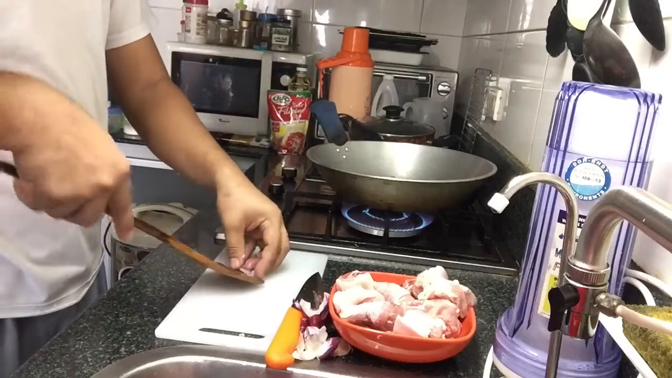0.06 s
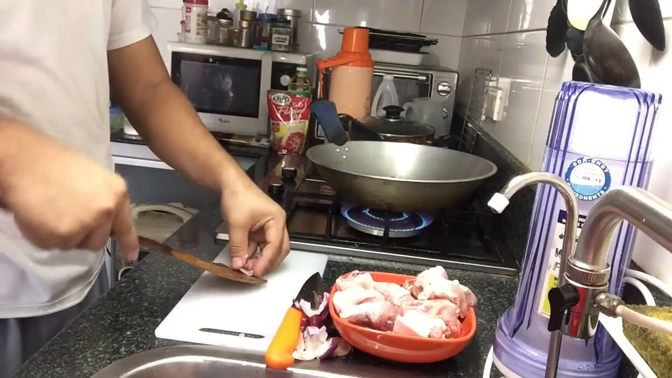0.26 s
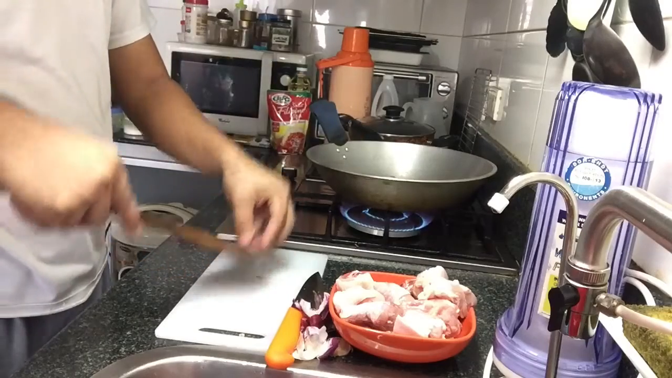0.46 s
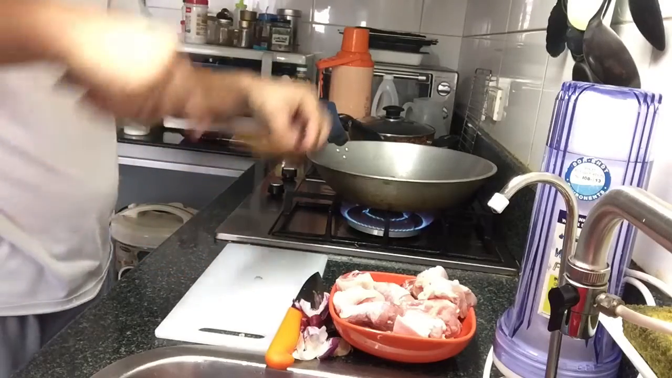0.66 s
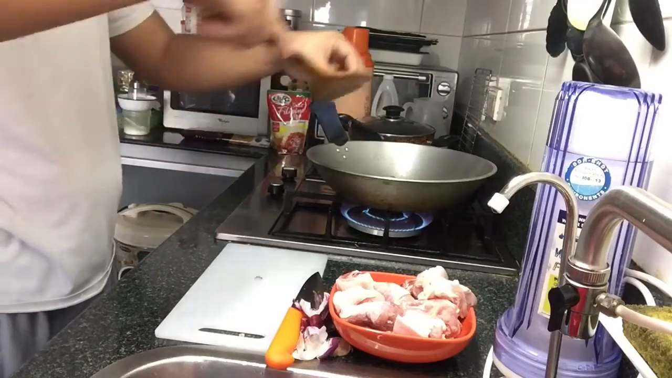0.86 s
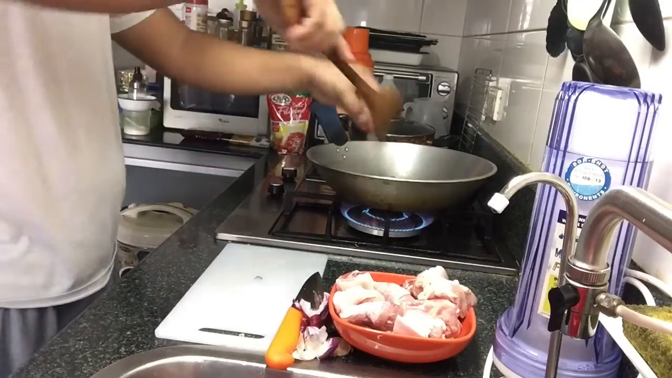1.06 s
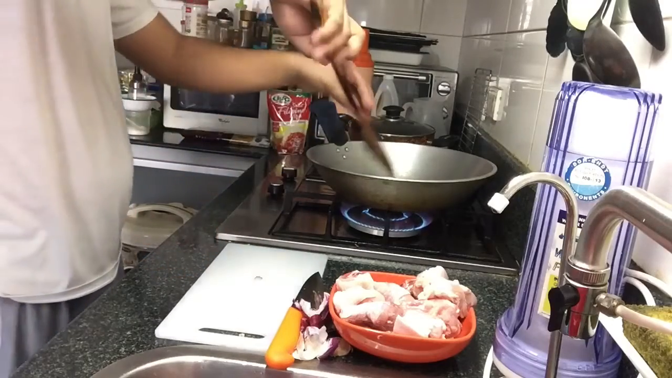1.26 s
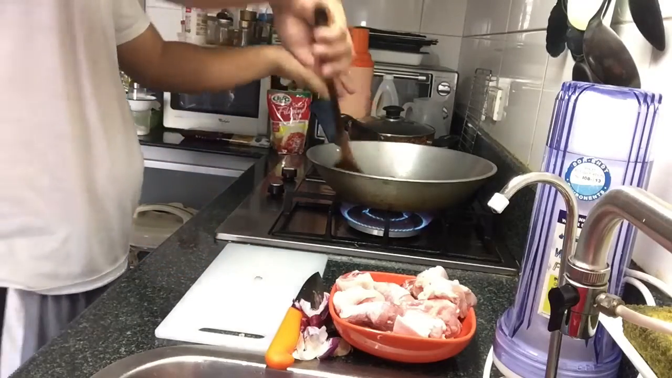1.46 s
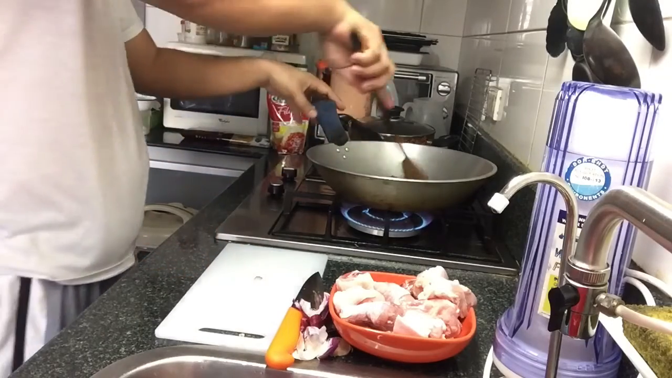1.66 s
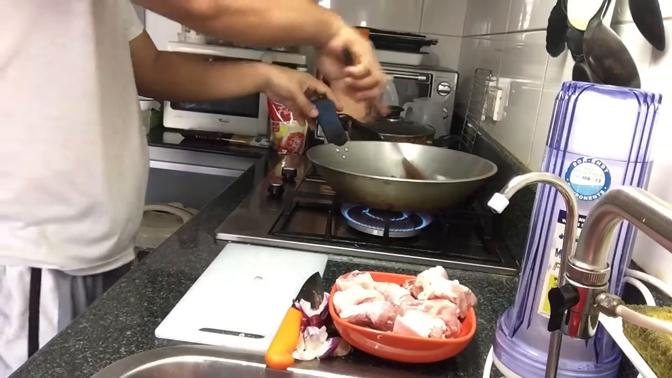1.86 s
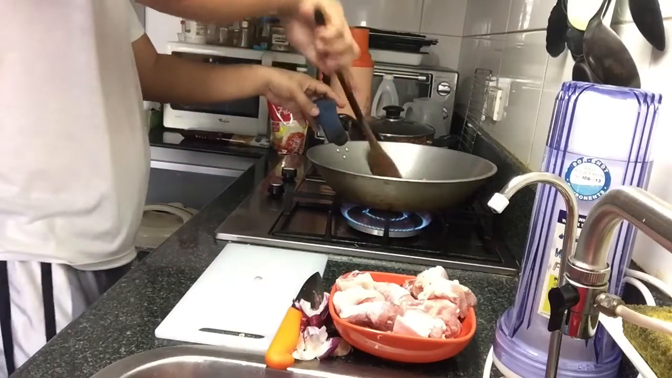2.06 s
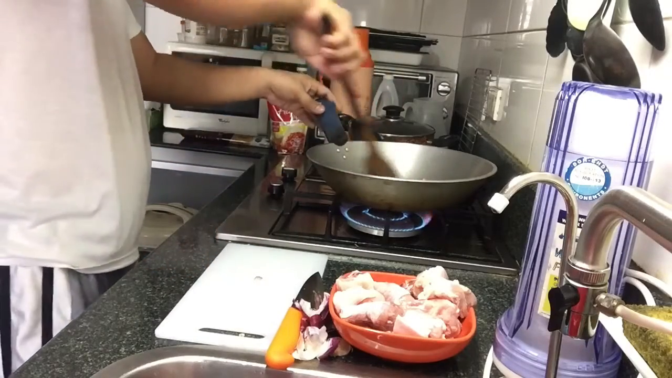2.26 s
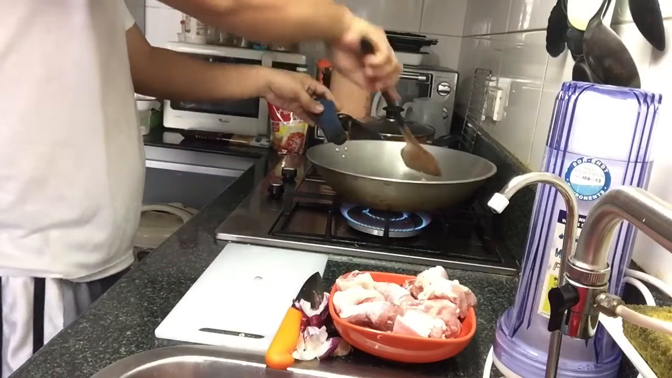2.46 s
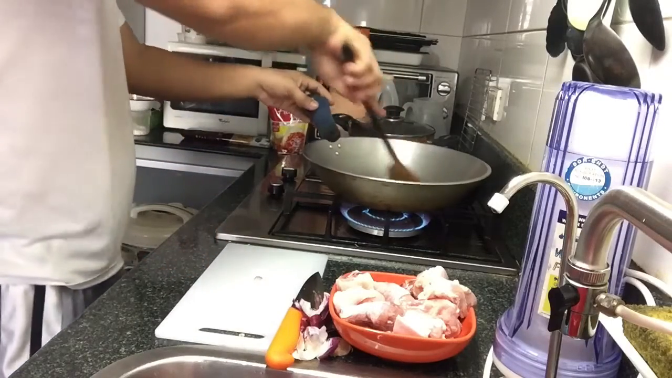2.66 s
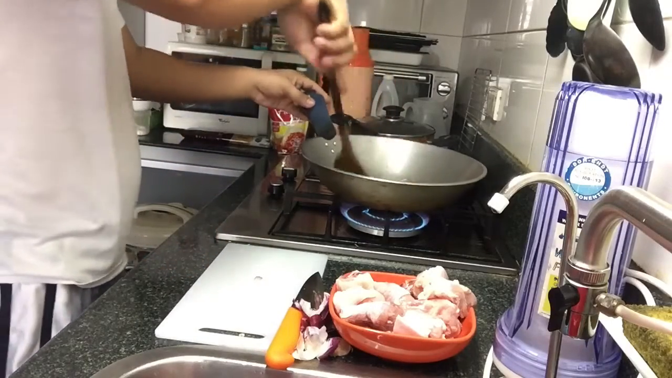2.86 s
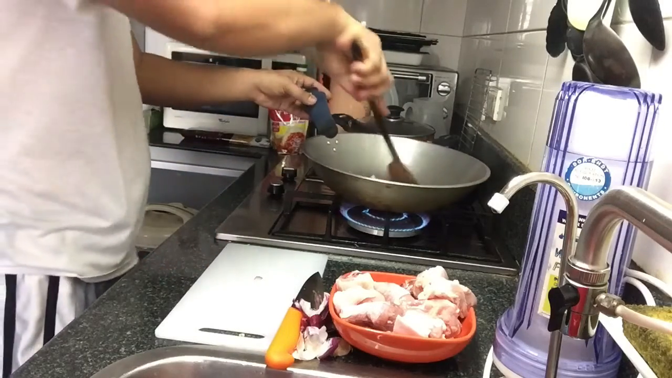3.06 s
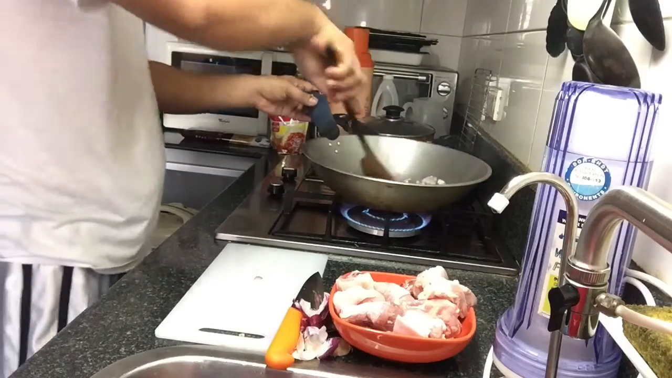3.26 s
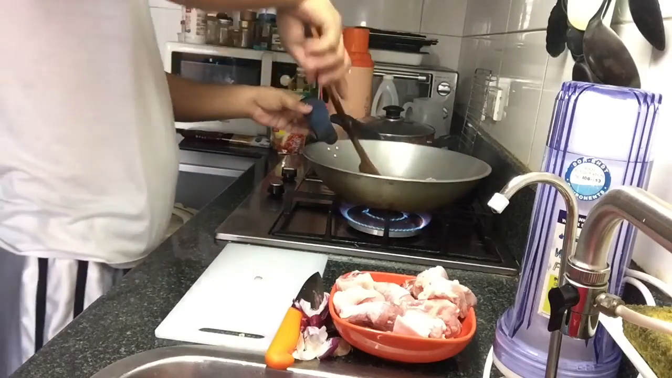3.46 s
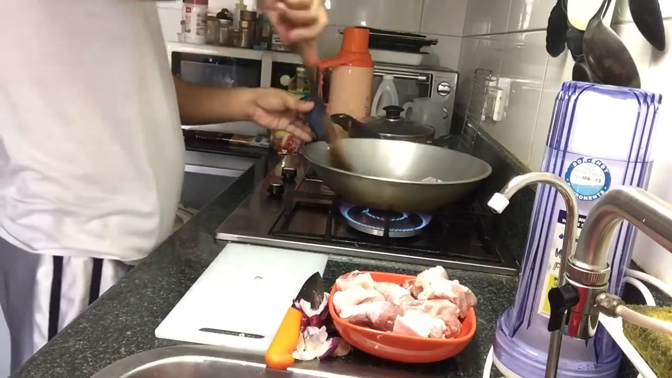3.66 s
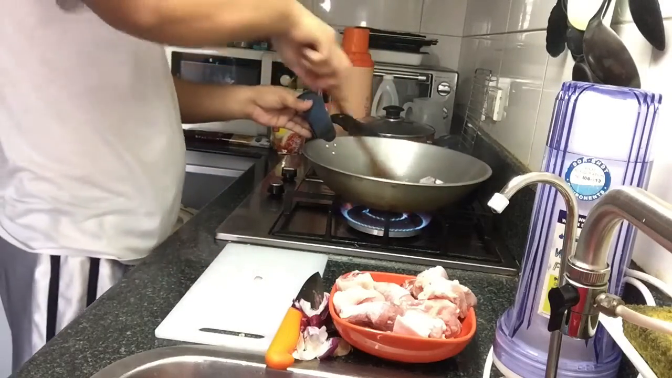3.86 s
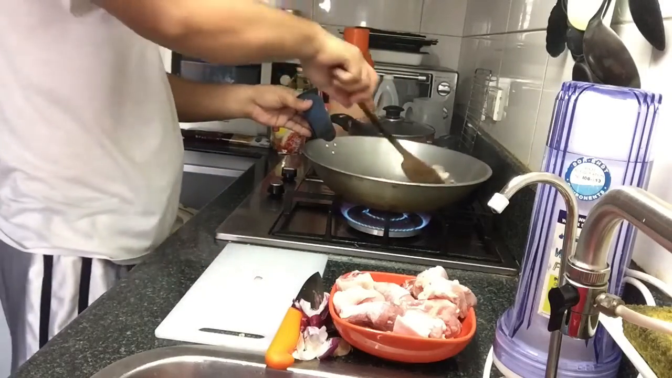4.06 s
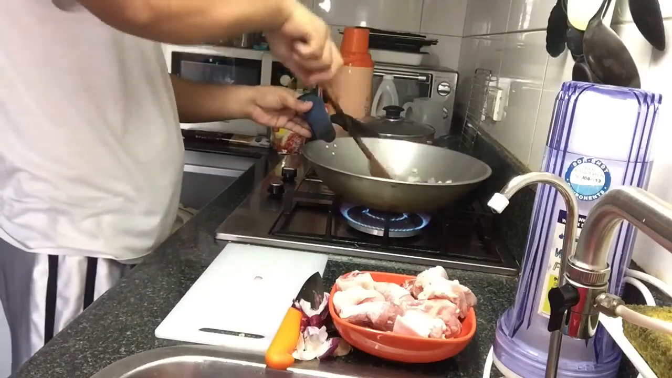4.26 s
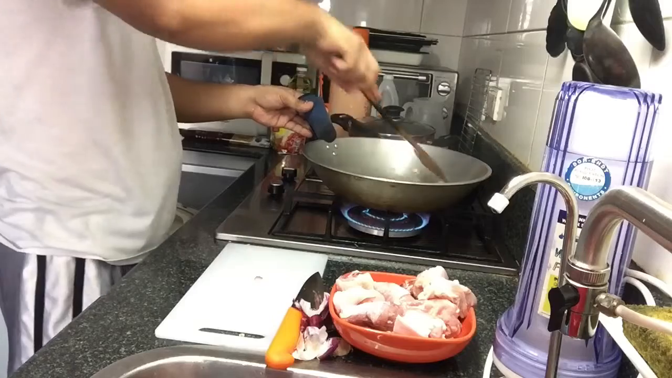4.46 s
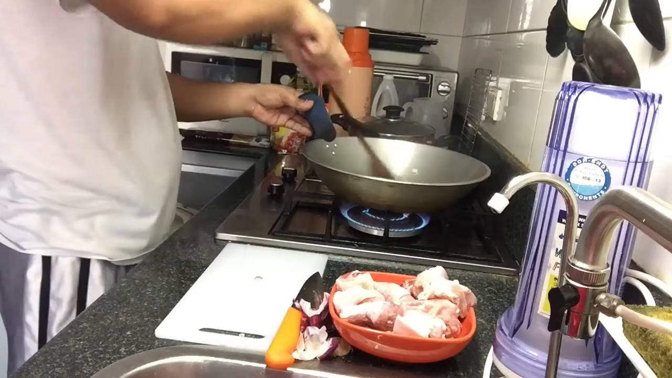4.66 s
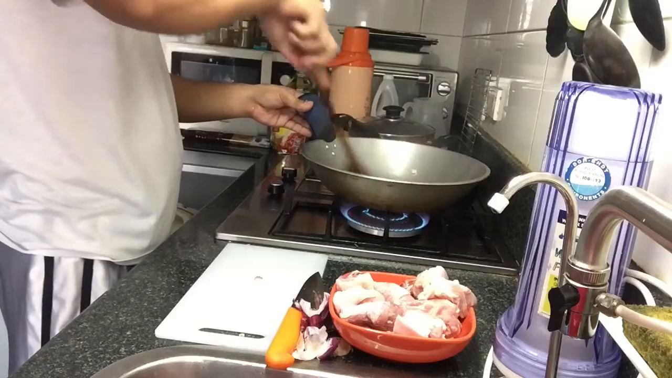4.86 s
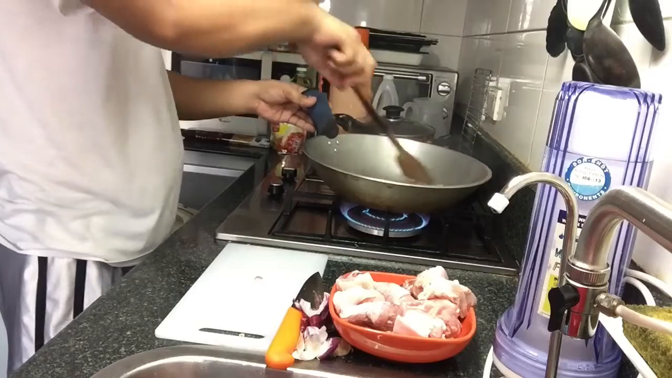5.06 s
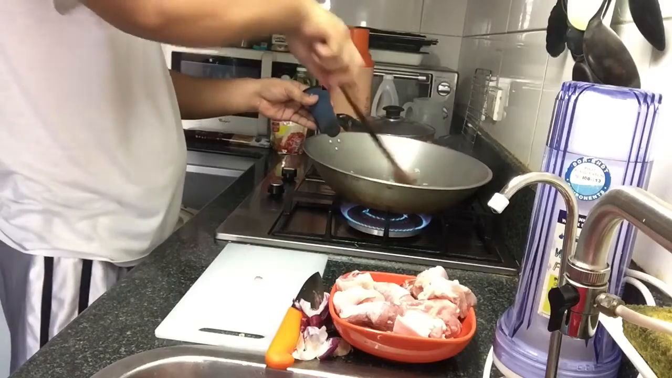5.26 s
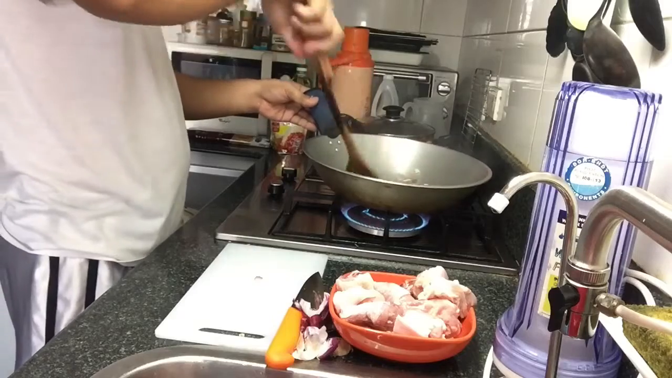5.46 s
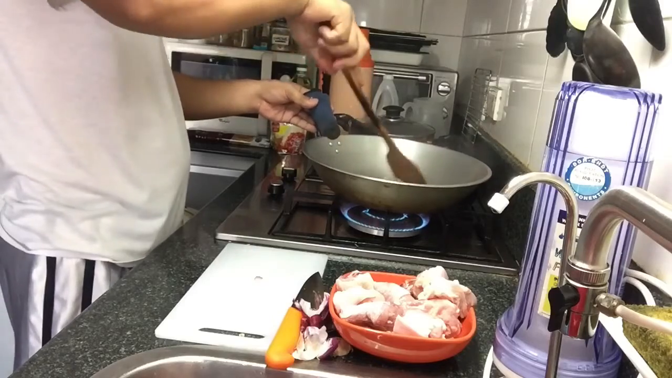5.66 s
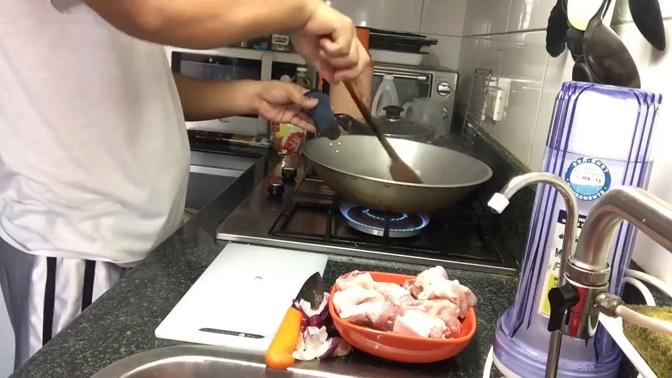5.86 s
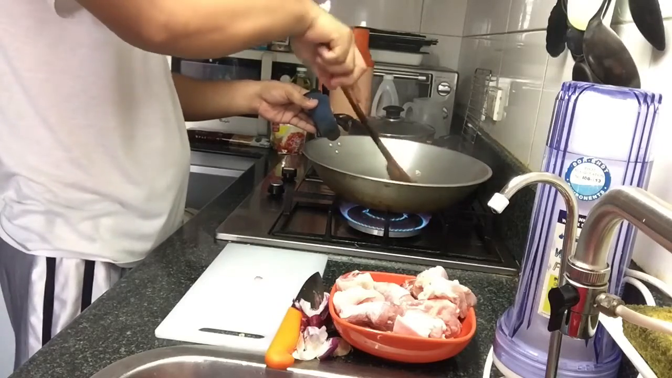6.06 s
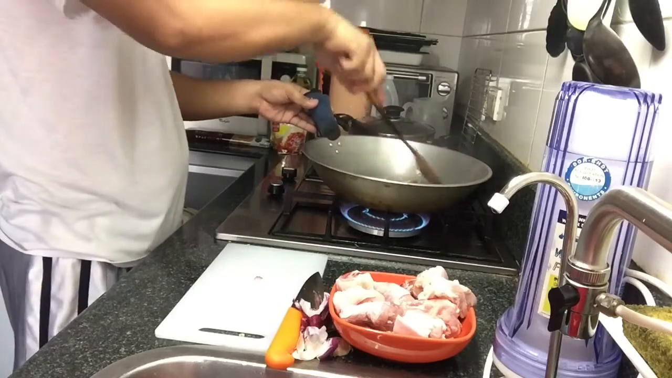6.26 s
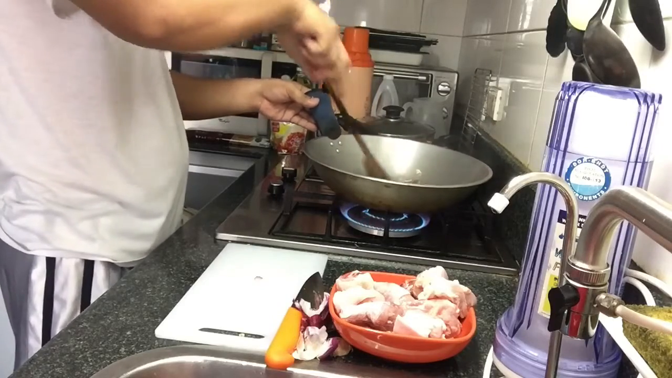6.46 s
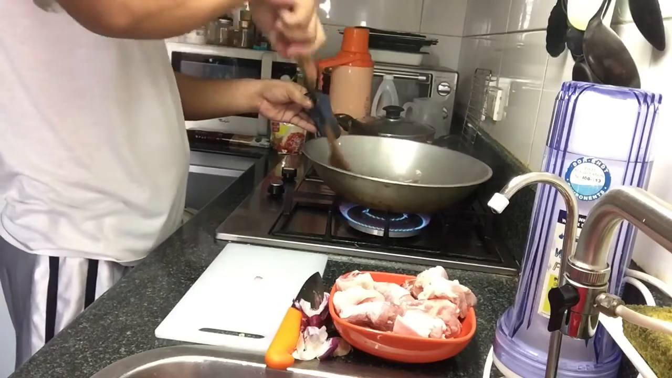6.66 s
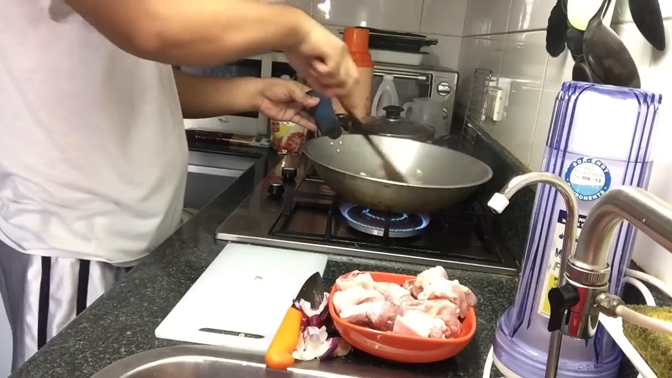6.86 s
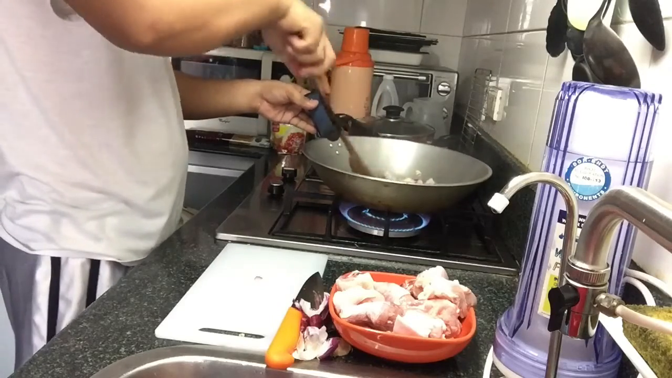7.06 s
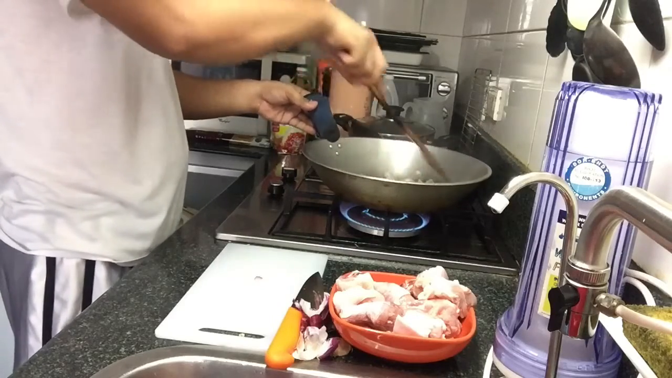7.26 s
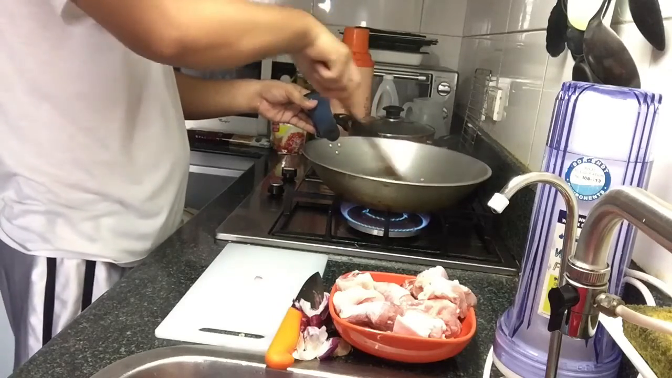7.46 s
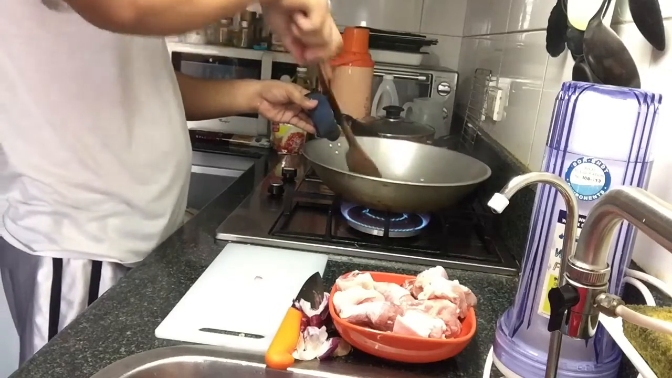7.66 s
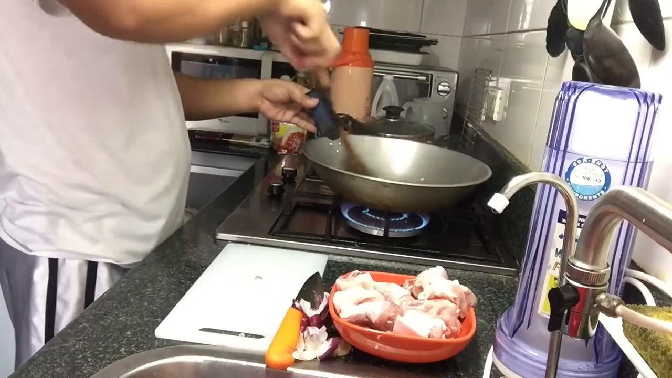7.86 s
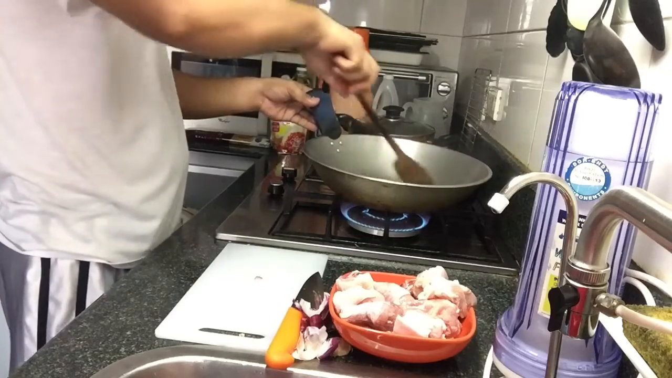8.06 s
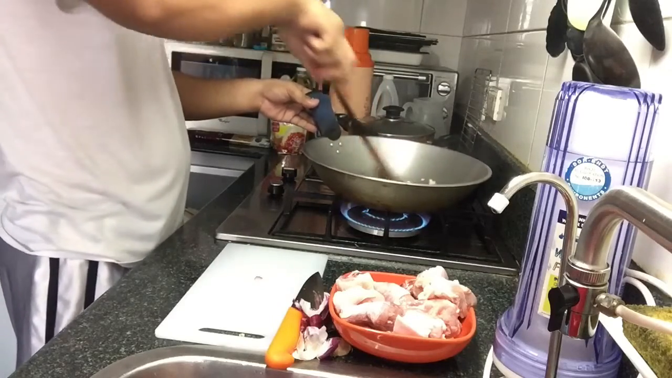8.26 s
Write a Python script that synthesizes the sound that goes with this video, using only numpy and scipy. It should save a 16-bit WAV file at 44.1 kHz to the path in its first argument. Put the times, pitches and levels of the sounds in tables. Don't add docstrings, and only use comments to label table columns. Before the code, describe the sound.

A continuous bright sizzle of garlic and onion in hot oil, fine and hissy, with tiny crackles and sharp spits, over low burner roar, compressor hum and a thin mid-pitched whine that enters around 0.7 s. From 0 to 1.5 s the frying is moderate, with only soft taps and bumps. At 1.5-2.1 s the wooden spatula starts knocking the steel wok and the fizz swells clearly. Scraping continues; a hard clank lands at 3.1 s, then a quick cluster at 3.5-3.9 s with dull short rings and grate thuds. A strong spit snaps at 4.0 s; softer bumps and scraping follow until 5. Knocks return at 5.3 and 5.6 s, the loudest clank at 6.4 s, another at 6.8 s, and a stronger scrape at 7.1 s. Light bumps at 7.5-8 s; sizzling continues to the end at 8.3 s. Close, dry, small tiled room, essentially mono.

```python
import sys
import numpy as np
from scipy import signal
from scipy.fft import rfft, irfft
from scipy.io import wavfile
from scipy.ndimage import uniform_filter1d

SR = 44100
rng = np.random.default_rng(int(sys.argv[2]) if len(sys.argv) > 2 else 0)


def ratio(d):
    e = np.asarray(d, float) / 20
    return 10 ** e


def bounce(signal):
    frames = np.transpose(np.atleast_2d(signal))
    limited = np.clip(frames, -1, 1)
    pcm = np.round(limited * 32767).astype(np.int16)
    wavfile.write(sys.argv[1], SR, pcm)


N = 367353

# frequency in Hz, density in dB per Hz.
AIR_SPECTRUM = [(12, -57), (25, -26), (55, -10), (85, -9), (118, 0), (230, -3), (330, -18.5), (450, -51),
                (640, -10), (810, -32), (1050, -14.5), (2500, -32), (5500, -90)]
# frequency in Hz, level in dB.
HUM = [(119.4, -51.5), (527.6, -72.5), (882.9, -68), (1238, -64.5), (1297, -81), (1653, -65)]
# time in seconds, level in dB.
WHINE = [
    (.66, -68),
    (.71, -55),
    (1.5, -57),
    (2.1, -54),
    (2.7, -60),
    (4.0, -57),
    (7.0, -56),
    (7.15, -53),
    (8.33, -55),
]
# frequency in Hz, level in dB, decay time t60 in seconds.
PAN_MODES = [(46.3, -22, 1), (66, 0, 0.096), (82.3, -33, 1), (110.9, 0, 0.59), (120.95, -2.5, 0.85),
             (160.5, 1, 0.9), (192.3, -2, 0.59), (214.5, -6, 0.62), (257.4, -6.5, 0.4), (385, 2.5, 0.33),
             (475.5, 6, 0.064), (595, 4.5, 0.18), (662, 4.5, 0.46), (735, -14, 0.17), (915, -16, 0.14),
             (1090, -6, 0.059), (1170, -4, 0.63), (1430, -11, 0.51), (1467, 4, 0.29), (1577, -1.5, 0.51),
             (1890, 1.5, 0.05), (1984, 2.5, 0.26), (1990, -26.5, 0.41), (2185, -17, 0.23), (2296, 0, 0.15),
             (2740, -2.5, 0.045), (2920, -11, 0.055), (3160, -1, 0.047), (3262, 3, 0.18), (3730, -11, 0.16)]
PART_EDGES_HZ = [300, 800, 1700]
# time in seconds, level in dB.
PRESSURE = [(0, -58), (1.55, -61), (1.72, -51.5), (2.74, -48), (4.08, -51), (4.34, -53), (4.9, -51),
            (5.24, -48.5), (5.4, -52), (5.7, -55), (5.98, -50.5), (6.38, -58), (6.77, -49), (7.07, -42),
            (7.28, -54), (7.66, -49), (7.79, -52.5), (8.33, -56)]
# start in seconds, blow in dB, grate thud in dB, favoured pitch in Hz.
BLOWS = [(0.054, -46.5, -65, 3370), (1.548, -44.5, -43, 2000), (1.709, -39.5, -61, 1530),
         (2.028, -36.5, -38, 3080), (2.791, -41.5, -38.5, 1800), (3.059, -30, -35, 3200),
         (3.53, -35.5, -29.5, 1480), (3.561, -31.5, -29, 2920), (3.63, -39, -39, 2920),
         (3.845, -34.5, -31, 2750), (5.33, -32.5, -39.5, 1350), (5.627, -32.5, -37, 3730),
         (6.149, -50, -45, 1130), (6.442, -27.5, -34.5, 1320), (6.84, -31, -38.5, 1920),
         (7.039, -49, -42, 2790), (7.19, -46, -46, 1500), (7.551, -44, -36, 2830)]
# start in seconds, belly level in dB, grate thud in dB.
BUMPS = [(0.387, -46, -45.5), (0.684, -46.5, -48), (1.177, -47, -56), (1.587, -42, -37.5),
         (2.574, -49, -39.5), (2.642, -48, -46), (2.716, -37, -38.5), (3.19, -44, -42), (3.251, -41, -41.5),
         (4.337, -48, -47.5), (4.698, -40.5, -38.5), (4.972, -41, -34), (5.937, -51, -36.5),
         (6.024, -50, -51), (6.341, -46, -51), (7.509, -38, -47), (7.596, -36.5, -44), (7.924, -45, -49),
         (7.966, -47, -47)]
# start in seconds, three pitches in Hz, level in dB.
RINGS = [(3.059, 1614, 1910, 3224, -37), (3.529, 1442, 2020, 4150, -34), (3.562, 2300, 2257, 2920, -30.5),
         (3.63, 2185, 2300, 2850, -41.5), (3.845, 1168, 1430, 2770, -36.5), (5.328, 662, 1098, 1395, -36),
         (5.622, 1200, 3190, 3730, -40), (6.442, 915, 1094, 1410, -31), (6.695, 2860, 3300, 3620, -42),
         (6.840, 1520, 1870, 2040, -35), (6.846, 2180, 3260, 3330, -42.5), (6.443, 481, 662, 800, -34),
         (3.846, 1980, 2330, 2900, -41), (5.640, 1206, 3300, 1590, -39)]
# time in seconds, fizz in dB, bubble fineness in dB.
FRYING = [(0.0, -34.5, 1), (0.16, -35, 1.5), (0.21, -37, -0.2), (0.56, -37, 1.5), (0.6, -38.5, 0.9),
          (1.55, -38, 0.3), (2.06, -29.5, 0.1), (3.5, -33, 0.1), (3.55, -31, -2.5), (3.69, -34, -0.8),
          (4.13, -29, 0.3), (4.22, -32.5, -0.8), (4.38, -30, 1), (5.26, -32.5, 0.7), (5.36, -31.5, 0.4),
          (6.89, -34, -1), (7.01, -34, 0.6), (8.33, -34, 1.3)]
# peak time in seconds, flare in dB, added fineness in dB.
FLARES = [(1.72, 2, -1), (2.55, 1.8, 0.5), (3.14, 1.5, -1.3), (4.44, 1.5, -.6), (1.87, 0.5, -1),
          (4.25, 0.3, 1.2), (3.74, .6, 1), (4.8, 1, 0), (5.0, 0.3, -0.7), (5.5, 2.9, 1.3),
          (5.69, 1.5, -1.2), (6.7, 0.1, 1.5), (7.06, 2.9, -0.5), (7.27, 2.5, -0.3), (7.68, 2.5, -2),
          (8.01, 1.8, -2.3)]
# start in seconds, peak in dB, centre in Hz.
SPITS = [(0.0542, -13, 3200), (0.1446, -18, 5470), (0.3696, -17, 8050), (0.5136, -16, 7900),
         (0.5414, -19, 7170), (0.9133, -26, 8120), (1.026, -14, 10500), (1.1793, -22, 3600),
         (1.269, -18, 6910), (1.483, -20, 3170), (1.699, -21, 7020), (1.9046, -16, 6770),
         (2.0767, -10.5, 7200), (2.2193, -16, 5270), (2.5546, -13.5, 5670), (2.74, -13, 8470),
         (3.058, -18, 3230), (3.5262, -13, 4160), (3.6611, -23, 6760), (3.8743, -17, 4580),
         (4.0073, -9, 11600), (4.122, -21, 5600), (4.79, -14, 4800), (5.8436, -26, 6220),
         (6.0702, -14.5, 7190), (6.7, -20, 3400), (7.2754, -16, 12400), (7.67, -18, 4200),
         (7.9079, -24, 11400), (7.9788, -12.5, 5700)]
# time in seconds, low edge in Hz.
SIDE_BANDS = [(1.514, 7570), (1.514, 12400), (1.514, 4230), (1.888, 5680), (1.888, 13780), (2.214, 8180),
              (2.816, 4230), (2.816, 8180), (2.935, 9640), (4.21, 8260), (4.21, 6280), (4.21, 14460),
              (5.188, 5140), (5.278, 12400), (5.418, 4650), (5.436, 6240), (5.436, 7600), (5.436, 9000),
              (5.436, 10400), (5.882, 6240), (6.092, 14460), (6.092, 5680), (6.092, 8260), (7.067, 6280),
              (8.181, 7570), (8.248, 10330), (8.318, 13900), (8.32, 6880)]
# frequency in Hz, density in dB per Hz.
FIZZ_SPECTRUM = [(300, -45), (800, -15), (1050, -9), (1700, -8.5), (2600, -4.5), (4200, 0), (6700, 2.5),
                 (8000, 0.5), (11500, 0), (15700, -1.5)]
# frequency in Hz, width in Hz, depth in dB.
BOWL_DIPS = [(4927, 98, -12), (7670, 450, -1.5), (10450, 440, -4.5)]


def evened(x):
    return x / np.sqrt(np.mean(x ** 2) + 1e-20)


def read(points, hz):
    f, value = np.transpose(points)
    return np.interp(np.log(hz + 1), np.log(f + 1), value)


def follow(rows, t):
    s, *columns = np.transpose(rows)
    return [np.interp(t, s, c) for c in columns]


def add(mix, s, sound):
    part = mix[max(round(s * SR), 0):][:len(sound)]
    part += sound[:len(part)]


def resonate(x, hz, width_hz):
    r = np.exp(-np.pi * width_hz / SR)
    poles = [2, -4 * r * np.cos(2 * np.pi * hz / SR), 2 * r * r]
    return signal.lfilter([1 - r * r, 0, r * r - 1], poles, x)


def drift(shape, frames, bins):
    field = uniform_filter1d(rng.standard_normal(shape), max(round(frames), 1), 0)
    return evened(uniform_filter1d(field, max(round(bins), 1), 1))


def clicks(per_s, spread_db):
    chance, sign, size = rng.random(N), rng.choice([-1., 1.], N), rng.exponential(1, N)
    return evened(sign * ratio(spread_db * np.minimum(size, 5)) * (chance < per_s / SR))


def kitchen(x, t60, wet_db):
    t = np.arange(SR // 2) / SR
    tail = rng.standard_normal(len(t)) * ratio(-60 * t / t60) * (t > .003)
    return x + ratio(wet_db) * signal.oaconvolve(x, tail / np.linalg.norm(tail))[:N]


def air():
    level_db = -50.5 - 2.5
    z = rfft(rng.standard_normal(N))
    return ratio(level_db) * evened(irfft(z * ratio(read(AIR_SPECTRUM, np.fft.rfftfreq(N, 1 / SR))), N))


def compressor():
    t = np.arange(N) / SR
    wobble = np.interp(t, np.linspace(0, t[-1], 110), rng.standard_normal(110))
    waver_s, unsteady_db, whine_hz = .0008, 1.1, 1118
    hum = 0
    for k, (hz, db) in enumerate(HUM + [(whine_hz, follow(WHINE, t)[0])]):
        level = np.sqrt(2) * ratio(db + unsteady_db * np.roll(wobble, 9000 * k))
        hum = hum + level * np.sin(2 * np.pi * hz * t + waver_s * hz * wobble + k)
    return hum


def contacts():
    rows = []
    for s, db, thud_db, hz in BLOWS:
        height = np.log2(hz / 2000)
        rows.append((s, db - height, db, db + 8.5 * height, thud_db, hz))
    for s, db, thud_db in BUMPS:
        rows.append((s, db, db - 12, db - 1, thud_db, 3130))
    return rows


def rocking(t):
    idle_db, rock_db, rock_s = -49.5, -3.5, 0.067
    power = ratio(idle_db) ** 2
    for s, _, _, _, thud_db, _ in contacts():
        since = np.maximum(t - s, 0) / rock_s
        power = power + (ratio(thud_db + rock_db) * since * np.exp(1 - since)) ** 2
    return np.sqrt(power)


def stirring():
    t, coarse_t = np.arange(N) / SR, np.arange(0, N + 200, 100) / SR
    scrape_db = follow(PRESSURE, t)[0]
    sway = np.interp(t, coarse_t, rocking(coarse_t))
    slips, bumps = clicks(per_s=1900, spread_db=2.5), clicks(per_s=2100, spread_db=6.0)
    scrape = ratio(14.5) * resonate(slips, 643, 26)
    rock = np.zeros(N)
    for hz, db, t60 in PAN_MODES:
        if hz > PART_EDGES_HZ[0]:
            scrape += ratio(db - 1.5 * abs(np.log2(hz / 660))) * resonate(slips, hz, 7 / t60)
        if hz < PART_EDGES_HZ[0]:
            rock += ratio(db) * resonate(resonate(bumps, hz, 8 / t60), hz, 57)
    return ratio(scrape_db - 5.5) * evened(scrape) + ratio(-3.5) * sway * evened(rock)


def rings():
    out, t = np.zeros(N), np.arange(int(.3 * SR)) / SR
    t60 = 0.18
    for s, *hz, db in RINGS:
        bounce_hz, turn = rng.uniform(25, 61, (3, 1)), rng.random((3, 1))
        throb = 1 + .6 * np.cos(2 * np.pi * (bounce_hz * t - .2))
        tones = (throb * np.sin(2 * np.pi * (np.outer(hz, t) + turn))).sum(0)
        decay = ratio(db + 1.0 - 60 * np.maximum(t - .008, 0) / t60)
        add(out, s, decay * np.minimum(t / 0.002, 1) * tones)
    return out


def wood_crack(t, belly_db, wall_db, rim_db):
    after = np.maximum(t - .014, 0)
    chatter = (ratio(-60 * after / .11) + .2 * ratio(-60 * after / .35)) * np.minimum(t / .0015, 1)
    crack = np.zeros(len(t))
    for db, hz, width_hz in [(wall_db + 9, 1120, 970), (belly_db + 8.5, 410, 590), (rim_db + 1.5, 2800, 1800)]:
        wood = rng.standard_normal(len(t)) * chatter
        crack += ratio(db) * resonate(resonate(wood, hz, width_hz), hz, width_hz)
    return crack


def knocks():
    out, t = np.zeros(N), np.arange(int(.4 * SR)) / SR
    hz, db, t60 = np.array(PAN_MODES).T[:, :, None]
    part = np.searchsorted(PART_EDGES_HZ, hz[:, 0])
    rise = 1 - np.exp(-t * hz / 0.7)
    after = np.maximum(t - .014, 0)
    choke = ratio(-60 * after / (0.8 * t60)) + 0.18 * ratio(-60 * after / (1.05 * t60))
    for s, belly_db, wall_db, rim_db, thud_db, favoured_hz in contacts():
        place_db, detune, turn, split = rng.standard_normal((4, len(PAN_MODES), 1))
        part_db = np.array([thud_db - 5.5, belly_db - 17.5, wall_db - 13, rim_db - 19.0])
        blow_db = part_db[part][:, None]
        octaves = abs(np.log2(hz / favoured_hz))
        favour_db = 5 * np.exp(-(octaves / 0.052) ** 2) - 6 * octaves * (hz > PART_EDGES_HZ[2])
        beat_hz = (14 + 4 * split) * (hz / 660) ** 0.52
        beat = 1 + 0.17 * np.cos(2 * np.pi * (beat_hz * t - .15))
        tone = np.sin(2 * np.pi * (hz * (1 + 0.0078 * detune) * t + turn))
        level = ratio(blow_db + db + favour_db + 1.9 * place_db)
        sound = (level * tone * beat * rise * choke).sum(0) + wood_crack(t, belly_db, wall_db, rim_db)
        add(out, s - .001, sound * np.minimum((t[-1] - t) / 0.044, 1))
    return out


def crackle():
    fizz_db = follow(FRYING, np.arange(N) / SR)[0]
    t = np.arange(SR // 100) / SR
    snaps = signal.oaconvolve(abs(clicks(per_s=90, spread_db=3.5)), ratio(-60 * t / .004))[:N]
    return ratio(fizz_db - 13) * evened(resonate(snaps * rng.standard_normal(N), 9000, 9000))


def spits():
    out, t = np.zeros(N), np.arange(SR // 8) / SR
    pop = 2.2 * ratio(-60 * t / 0.003) + .7 * ratio(-60 * t / 0.016)
    echo = 0.29 * np.roll(pop, round(0.014 * SR))
    steam = ratio(-6 - 60 * t / 0.11) * np.minimum(t / 0.0029, 1)
    shape = (pop + echo + steam) * np.minimum(t / .0004, 1)
    for s, db, hz in SPITS:
        noise = rng.standard_normal(len(t))
        hiss = 0.23 * hz / 7000 * np.diff(noise, prepend=0)
        puff = evened(resonate(noise, hz, 0.19 * hz + hz * hz / 25000) + hiss)
        add(out, s - .001, ratio(db - 10) * shape * puff)
    return out


def side_bands():
    out, hz = np.zeros(N), np.fft.rfftfreq(2048, 1 / SR)
    fade = signal.windows.kaiser_bessel_derived(2048, 4 * np.pi)
    for s, low_hz in SIDE_BANDS:
        high_hz = low_hz + min(.22 * low_hz, 1340)
        db = follow(FRYING, s)[0] - 9
        band = irfft(rfft(rng.standard_normal(2048)) * (hz > low_hz) * (hz < high_hz))
        add(out, s - 1024 / SR, ratio(db - 0.5) * evened(band) * fade)
    return np.array([out, -out])


def frying(t):
    flare_s = 0.078
    s, *columns = np.transpose(FLARES)
    swells = np.exp(-((np.asarray(t)[..., None] - s) / flare_s) ** 2)
    return [slow + swells @ c for slow, c in zip(follow(FRYING, t), columns)]


def fizz_colour(hz):
    dips_db = sum(db * np.exp(-((hz - f) / w) ** 2) for f, w, db in BOWL_DIPS)
    colour = ratio(read(FIZZ_SPECTRUM, hz) + dips_db)
    return colour / np.sqrt(np.mean(colour ** 2 * (hz > 5200) * (hz < 10000)))


def sizzle():
    t = np.arange(SR // 20) / SR
    puff = ratio(-60 * t / 0.016) + 0.093 * ratio(-60 * t / 0.18)
    crowd = signal.oaconvolve(clicks(per_s=4600, spread_db=3.0) ** 2, puff)[:N]
    hz, times, z = signal.stft(evened(np.sqrt(abs(crowd)) * rng.standard_normal(N)), SR, nperseg=256)
    fizz_db, fine_db = frying(times)
    wander_db = 0.66 * drift((len(times), 2), frames=37, bins=1).T
    large, mist = np.clip((5200 - hz) / 800, 0, 1), np.clip((hz - 9600) / 1600, 0, 1)
    shares_db = np.outer(large, -1.07 * fine_db + wander_db[0])
    shares_db += np.outer(mist, 0.72 * fine_db + wander_db[1])
    patches_db = 0.74 * drift(z.T.shape, frames=14, bins=6).T
    flares_db = 0.33 * drift(z.T.shape, frames=9, bins=85).T
    flares_db += 0.41 * drift(z.T.shape, frames=16, bins=143).T
    level = ratio(fizz_db - 0.89 + shares_db + patches_db + flares_db)
    return signal.istft(z * fizz_colour(hz)[:, None] * level, SR, nperseg=256)[1][:N]


def in_pan(fizz):
    upper = [mode for mode in PAN_MODES if mode[0] > PART_EDGES_HZ[1]]
    return fizz + sum(ratio(db - 11) * resonate(fizz, hz, 8 / t60) for hz, db, t60 in upper)


def scene():
    background = air() + compressor() + stirring()
    near = kitchen(rings() + knocks() + crackle() + spits(), t60=.42, wet_db=-10)
    fry = kitchen(in_pan(sizzle()), t60=0.086, wet_db=-10.0)
    return np.tile(background + near + fry, (2, 1))


def low_pass(x):
    return signal.sosfilt(signal.butter(12, 17040, fs=SR, output="sos"), x)


def record(dry):
    bass_cut = signal.butter(2, 40, "high", fs=SR, output="sos")
    mix = signal.sosfilt(bass_cut, dry) + side_bands()
    top_cut = signal.firwin(1501, 15760, window=("kaiser", 11), fs=SR)
    mix = signal.oaconvolve(mix, top_cut[None], "same")
    return low_pass(mix)


dry = scene()
out = record(dry)
bounce(out)
```